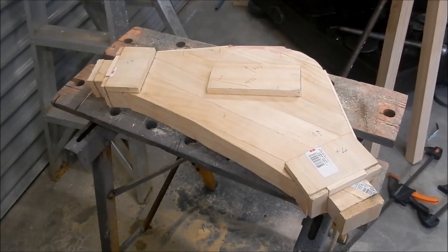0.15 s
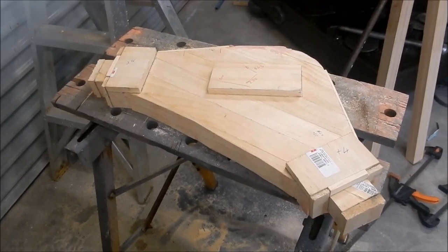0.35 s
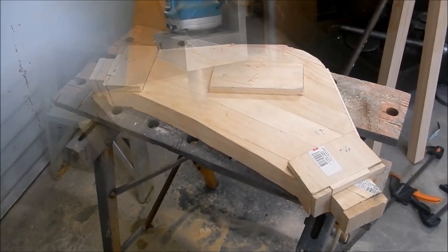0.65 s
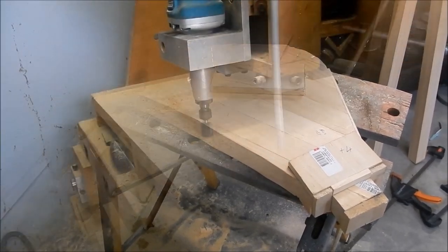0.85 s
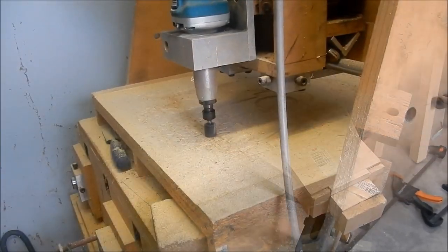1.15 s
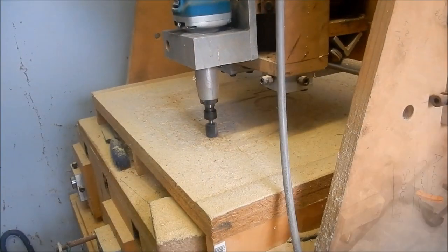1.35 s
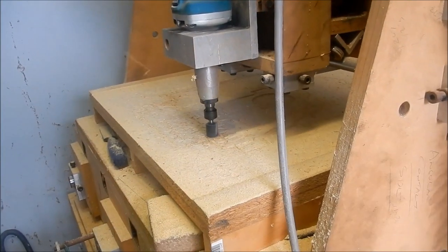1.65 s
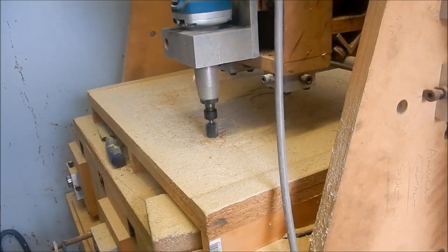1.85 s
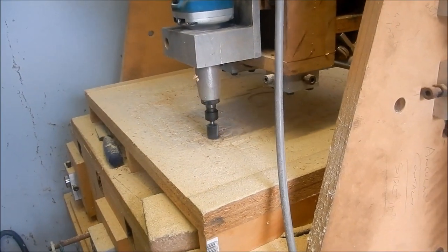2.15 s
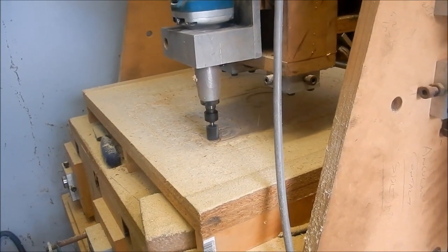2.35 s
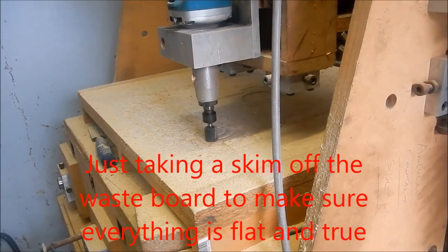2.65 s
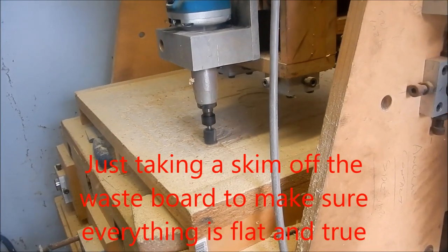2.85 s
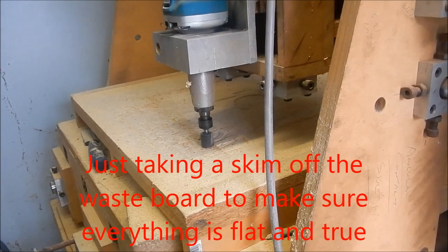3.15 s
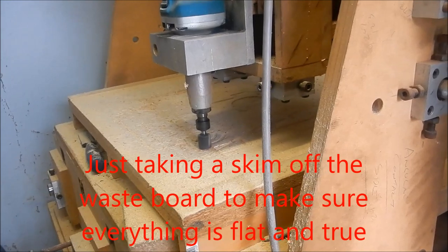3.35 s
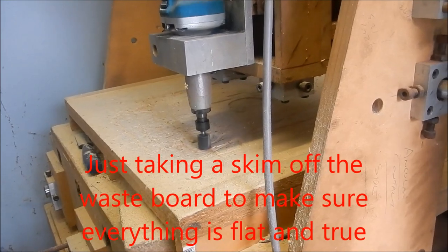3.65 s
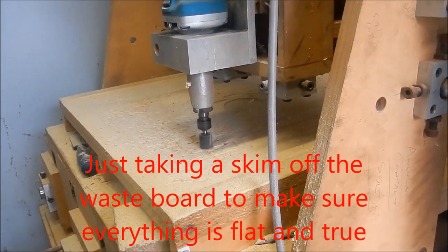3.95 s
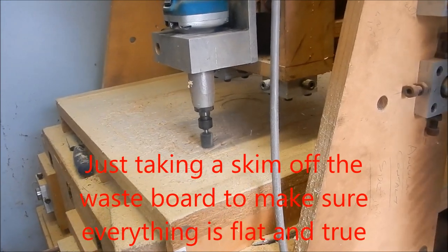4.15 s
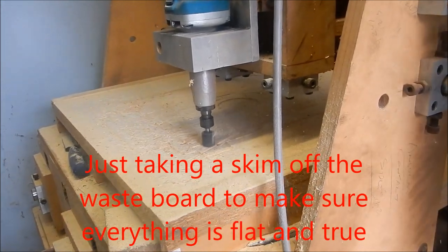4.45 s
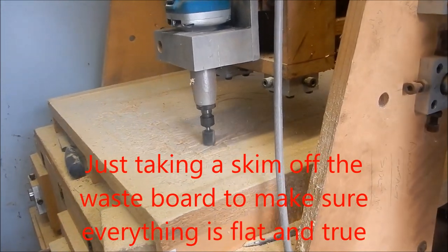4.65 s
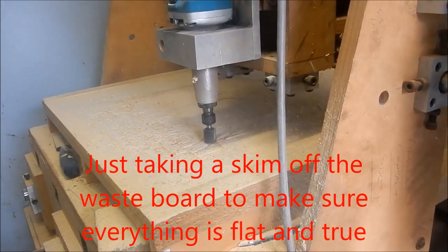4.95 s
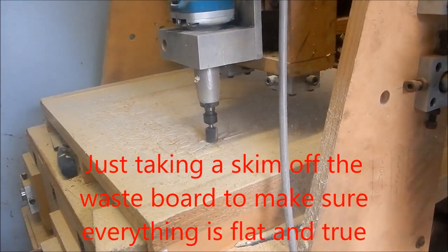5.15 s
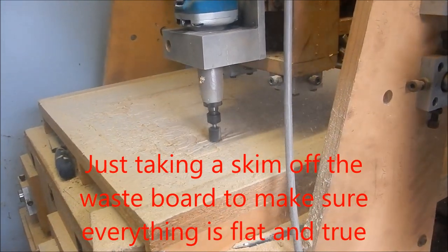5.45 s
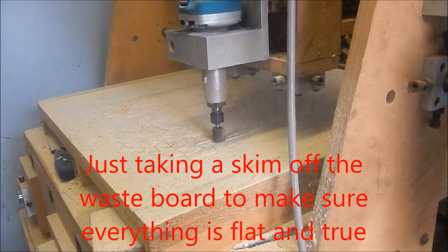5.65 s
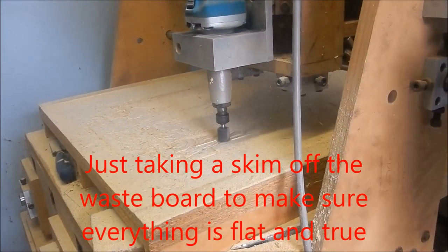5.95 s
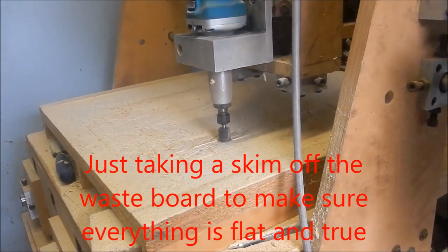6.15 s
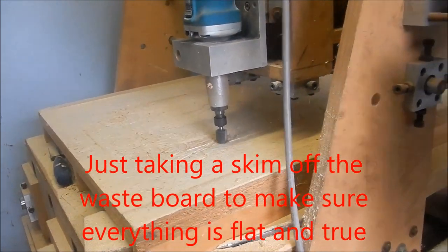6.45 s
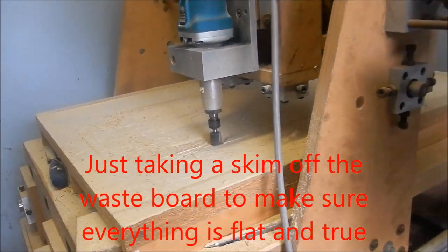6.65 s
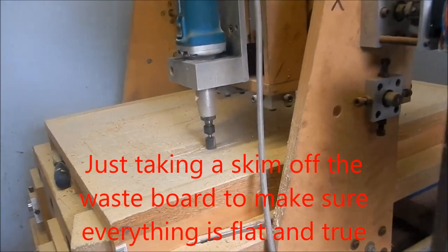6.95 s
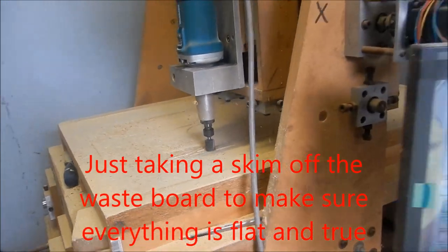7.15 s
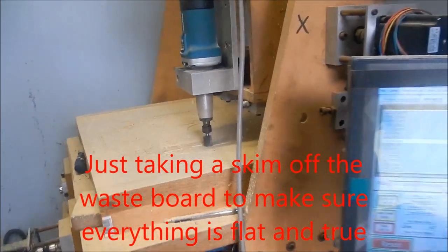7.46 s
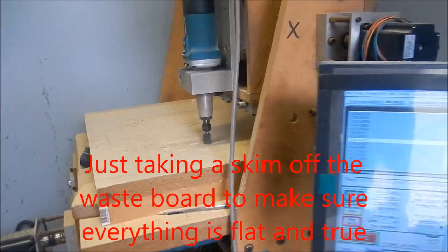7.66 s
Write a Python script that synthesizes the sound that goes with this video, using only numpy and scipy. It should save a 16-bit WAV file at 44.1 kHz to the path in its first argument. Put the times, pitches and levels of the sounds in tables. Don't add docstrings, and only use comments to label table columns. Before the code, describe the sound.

Wind in a quiet yard lasts an instant, then a router switches in abruptly, brightest at first. The continuous electric whine wavers as room reflections swell and cancel its tones, with chips and cooling air hissing around it. Midway, the feed motors turn round with a short falling and rising hum, then buzz faintly behind the cutting. Close small-workshop sound from a modest stereo microphone, its extreme top cut off.

```python
import sys
import numpy as np
from scipy import signal
from scipy.io import wavfile

SR = 44100
rng = np.random.default_rng(int(sys.argv[2]) if len(sys.argv) > 2 else 0)


def master_out(mix):
    frames = np.transpose(np.atleast_2d(mix))
    ceiling = np.clip(frames, -1, 1)
    pcm = np.round(ceiling * 32767).astype(np.int16)
    wavfile.write(sys.argv[1], SR, pcm)


def gain_from_db(level_db):
    decades = np.asarray(level_db, float) / 20
    return 10 ** decades


N = 344862

# (time [s], speed [turns/s])
GOVERNOR = [(.23, 388), (.42, 389.6), (1.3, 391), (1.84, 392.3), (3.4, 393.1), (3.8, 385), (4.1, 386.5),
            (5.03, 386.6), (5.26, 391.3), (6.11, 391.4), (7.0, 389.4), (7.82, 385)]
# (time [s], half length [s], speed lost [turns/s])
BITES = [
    (.74, .4, 3.2),
    (1.53, .26, 3.6),
    (2.33, .3, 6.3),
    (2.86, .28, 8.2),
    (4.27, .15, .9),
    (5.75, .4, 2.3),
    (6.55, .45, 3.1),
    (7.72, .1, 2.9),
]


def spindle_speed():
    return in_time(GOVERNOR)[0] - sum(lost * bell(s, length) for s, length, lost in BITES)


# (time [s], hiss level [dB], brightness [dB])
BIT_LOAD = [(0.25, -32, -5.5), (1.09, -35, -8), (1.51, -32.5, -9), (2.46, -39, -8), (2.74, -36.5, -11),
            (2.78, -41.5, -3), (2.86, -40, -9), (3.6, -36.5, -12.5), (3.96, -37.5, -8.5),
            (5.77, -36.5, -11), (6.49, -37.5, -9.5), (6.93, -37, -10.5), (7.33, -37.5, -10.5),
            (7.82, -37, -9.5)]


def bit_load():
    hiss_db, bright_db = in_time(BIT_LOAD)
    whine_swing_db = 0.85 * (hiss_db - np.mean(hiss_db))
    return hiss_db, 1.78 * (bright_db - np.mean(bright_db)), whine_swing_db


def whine(turn, hz, whine_swing_db, bright_db):
    return low_tones(turn, hz) + cage_sidebands(turn, hz) + overtones(turn, hz, whine_swing_db, bright_db)


# (time [s], unbalance tone [dB], two-flute tone [dB], unbalance left over right [dB])
LOW_TONES = [(.24, -46.5, -47, 13), (.5, -51.5, -43, 17.5), (1.1, -46, -43, -2), (1.65, -48.5, -43.5, 0),
             (2.3, -51, -46.5, 0.5), (2.75, -48.5, -59, 7), (3.0, -51, -49, 7), (3.4, -53.5, -53, 12),
             (3.66, -49, -37, 15), (3.9, -55.5, -44, 11), (4.2, -49.5, -40.5, 9.5), (4.8, -43.5, -40, 4.5),
             (5.3, -43.5, -52.5, 0.5), (5.9, -46.5, -45.5, -0.5), (6.2, -46.5, -73, 0),
             (6.9, -45, -45.5, 0.5), (7.35, -53.5, -50, 3), (7.7, -73, -36, 2)]


def low_tones(turn, hz):
    unbalance_db, flute_db, unbalance_lean_db = in_time(LOW_TONES)
    unbalance_db = unbalance_db + nulls_db(1)
    flute_db = flute_db + nulls_db(2)
    flute_lean_db = 5.5 + 0.55 * np.clip(-47.0 - flute_db, 0, 15)
    unbalance = gain_from_db(unbalance_db + 1.28 * drift(9.0)[0]) * swimming(turn, hz, steady=8.1, rate=17.0)
    flutes = gain_from_db(flute_db + 1.3 * drift(12.0)[0]) * swimming(turn ** 2, 2 * hz, steady=7, rate=10)
    return left_over_right(unbalance_lean_db - 3.0) * unbalance + left_over_right(flute_lean_db - 3.0) * flutes


# (time [s], level by the first tone [dB], level by the second tone [dB])
CAGE_LEVEL = [(.2, -65, -62), (1.6, -63, -54), (2.6, -65, -60), (3.2, -70, -55), (3.52, -70, -52),
              (3.8, -76, -67), (5, -63, -62), (6.3, -62, -56), (6.6, -63, -72), (7.5, -63, -64),
              (7.82, -89, -54)]
CAGE_BEAT = (42.4, 33.5)


def cage_sidebands(turn, hz):
    first_db, second_db = in_time(CAGE_LEVEL)
    beat_one, beat_two = np.exp(2j * np.pi * np.outer(CAGE_BEAT, np.arange(N)) / SR)
    first = gain_from_db(first_db) * swimming(turn * beat_one, hz, steady=1.2, rate=9.2)
    second = gain_from_db(second_db) * swimming(turn ** 2 * beat_two, 2 * hz, steady=1.1, rate=3.6)
    return first + second


# (multiple of turn rate, level [dB])
LADDER = [(1, -2), (2, 0), (3, -6), (4, -7.5), (5, -4), (6, -4.5), (7, -7.5), (8, -4), (9, -11), (10, -7),
          (11, -14), (12, -6.5), (13, -15), (14, -8.5), (15, -21), (16, -7)]


def overtones(turn, hz, whine_swing_db, bright_db):
    ladder, whine_db = dict(LADDER), -47 + whine_swing_db
    out, power, flicker = 0, turn ** 2, gain_from_db(2.64 * drift(27.0)[0])
    for k in range(3, 41):
        power = power * turn * np.exp(2j * np.pi * rng.random())
        level_db = ladder.get(k, -6.5 - 0.68 * (k - 16) - 5.5 * (k % 2))
        load_db = max(k - 10, 0) * (0.025 * bright_db + 0.04 * whine_swing_db)
        flare, rest = flares(k, power, k * hz, flicker)
        swim = swimming(power, k * hz, steady=0.8 + 0.006 * k, rate=6.0 + 0.26 * k)
        out = out + flare + gain_from_db(level_db + nulls_db(k) + whine_db + load_db) * rest * swim
    return out


# (time [s], multiple of turn rate, half length [s], level
# [dB])
FLARES = [(0.317, 5, 0.17, -38.5), (.555, 5, 0.1, -44), (.79, 6, 0.083, -42.5), (2.863, 5, 0.14, -47.5),
          (4.29, 4, 0.56, -50.5), (.78, 7, 0.053, -36.5), (7.366, 4, 0.22, -50.5), (1.0, 6, 0.16, -45),
          (1.03, 5, 0.19, -42.5), (7.76, 6, 0.076, -43.5), (1.298, 10, 0.053, -39.5), (1.405, 5, 0.17, -42),
          (1.586, 10, 0.16, -41.5), (1.597, 8, 0.039, -39), (2.255, 5, .13, -43.5), (2.99, 6, 0.13, -45.5),
          (3.677, 4, 0.13, -45.5), (4.524, 8, 0.27, -48), (5, 8, 0.14, -43), (5.32, 5, .12, -42.5),
          (5.355, 3, 0.27, -42.5), (5.72, 6, 0.13, -42.5), (5.73, 8, .096, -46), (5.964, 8, 0.38, -48),
          (6.633, 12, .11, -49), (6.94, 5, 0.12, -44), (6.932, 6, 0.19, -44.5), (7.17, 6, 0.14, -44),
          (7.636, 6, 0.063, -40.5), (7.714, 10, 0.078, -45),
          (.287, 12, .14, -44.5), (.32, 30, .17, -48), (.32, 26, .19, -49), (.43, 28, .19, -48),
          (.434, 16, .1, -40), (.442, 22, .088, -37.5), (0.438, 18, 0.051, -40), (0.477, 14, 0.22, -36.5),
          (.64, 18, 0.16, -47), (.92, 16, .08, -42), (.97, 22, .17, -44), (1.015, 14, .13, -43.5),
          (1.505, 22, .25, -47), (.8, 14, 0.22, -46), (2.72, 30, 0.17, -56), (2.718, 16, 0.091, -48),
          (4.186, 18, .15, -50), (4.4, 26, 0.64, -56), (5.486, 16, 0.22, -49.5), (5.64, 22, 0.21, -50.5),
          (6.025, 14, 0.077, -49), (6.697, 14, .1, -50.5), (7.05, 10, .055, -45), (.75, 26, .3, -52),
          (1.3, 22, 0.18, -48.5)]


def flares(k, power, hz, flicker):
    swell, rest = 0, 1
    for s, multiple, length, level_db in FLARES:
        if round(multiple) == k:
            swell = np.maximum(swell, gain_from_db(level_db) * bell(s, length))
            rest = rest * (1 - bell(s, length))
    own_flicker = np.roll(flicker, 9001 * k)
    return np.sqrt(2) * lean(hz) * (swell * own_flicker * power.real), rest


# (time [s], multiple of turn rate, half length [s], depth [dB])
NULLS = [(0.908, 1, 0.03, -25), (0.88, 2, 0.059, -22), (1.237, 2, 0.096, -13), (1.356, 2, 0.056, -17),
         (1.454, 2, 0.063, -12), (1.04, 1, 0.032, -7), (1.19, 1, 0.14, -8), (1.9, 2, 0.21, -9),
         (2.142, 2, 0.08, -8), (2.39, 2, 0.08, -9), (2.895, 1, 0.14, -11), (3.278, 2, 0.27, -11),
         (4.912, 1, .08, -3), (5.097, 1, 0.052, -5), (5.09, 2, 0.054, -10), (6.72, 2, 0.048, -6),
         (7.36, 2, 0.075, -17), (7.538, 2, 0.17, -8), (3.85, 2, .12, 0), (7.79, 2, 0.064, -5.5),
         (4.3, 10, 0.46, -8), (7.3, 3, 0.38, -15), (4.4, 3, 0.13, -10), (5.14, 4, .45, -7),
         (7.05, 4, 0.23, -12), (6.55, 5, .3, -10), (4.66, 5, .3, -5), (6.5, 6, 0.28, -7),
         (4.87, 6, .25, -7), (3.8, 8, .25, -10)]


def nulls_db(k):
    return sum(depth_db * bell(s, length) for s, multiple, length, depth_db in NULLS if round(multiple) == k)


# (frequency [Hz], density [dB per Hz])
AIR = [(30, -40), (50, -31), (75, -20), (150, -29), (300, -16), (600, -7), (1000, -6), (2000, -2.5),
       (3000, -1), (5000, -5), (8000, -8.5), (12000, -16), (16000, -22)]
# (frequency [Hz], width [Hz], depth [0-1])
BENCH_DIPS = [
    (890, 25, 0.06),
    (1031, 23, 1),
    (3840, 750, 0.37),
]


def hiss(turn, hiss_db, bright_db):
    air = banded_noise(AIR, patchy_db=0.78, rate=19.0, bright_db=0.5 * bright_db)
    for hz, width_hz, depth in BENCH_DIPS:
        echo = signal.lfilter(*signal.iirpeak(hz, hz / width_hz, fs=SR), air)
        air = air - np.clip(depth, 0, 1) * echo
    puff = 1 + 0.08 * turn.real
    return gain_from_db(hiss_db - 1.5) * puff * air


def feed():
    return feed_reversal() + cross_steps() + return_hum()


# (frequency [Hz], level [dB])
FRAME = [
    (480, -56),
    (530, -63),
    (620, -47.5),
    (685, -56),
    (720, -62),
    (800, -86),
]


def feed_reversal():
    t = np.arange(N) / SR
    slowing = 1400 * np.maximum(3.33 - t, 0)
    speeding_up = 1600 * np.maximum(t - 3.45, 0)
    step_hz = np.minimum(489 + slowing + speeding_up, 860)
    return glide(step_hz, at_hz(FRAME, step_hz), rate=78.0)


# (time [s], step rate [Hz], half length [s], level [dB])
CROSS_STEPS = [
    (3.403, 120.5, .1, -59),
    (7.48, 125, 0.077, -68),
]


def cross_steps():
    t, out = np.arange(N) / SR, 0
    for s, hz, length, level_db in CROSS_STEPS:
        sagging_hz = hz - 150 * np.clip(t - s, -length, length)
        out = out + bell(s, length) * glide(sagging_hz, level_db, rate=15.0)
    return out


# (start [s], frequency [Hz], level [dB])
RETURN_HUM = [
    (3.2, 183, -79),
    (3.2, 199, -73.5),
    (3.9, 231.5, -69.5),
    (2.6, 301.5, -79),
]


def return_hum():
    t, end, out = np.arange(N) / SR, 7.65, 0
    for s, hz, level_db in RETURN_HUM:
        fade_db = np.interp(t, [s - 0.1, s, end, end + 0.18], [-100, level_db, level_db, -100])
        out = out + glide(np.full(N, hz), fade_db, rate=10.4)
    return out


def glide(hz, level_db, rate):
    steps = np.exp(2j * np.pi * np.cumsum(hz) / SR)
    return gain_from_db(level_db) * swimming(steps, np.median(hz), steady=1.25, rate=rate)


# (frequency [Hz], density [dB per Hz])
YARD = [(20, -28), (59, -5), (290, -8.5), (380, -12), (900, -13), (1500, -22), (1900, -19), (2800, -37),
        (3500, -33.5), (7000, -37.5), (11000, -44), (15500, -58)]
# (time [s], level [dB])
YARD_LEVEL = [
    (0, -49),
    (.7, -52.5),
    (1.5, -57.5),
    (1.7, -52),
    (1.74, -86),
    (7.82, -120),
]
# (start [s], frequency [Hz], width [Hz], level [dB])
YARD_WHISTLES = [(0.051, 1300, 40, -64), (0.073, 1707, 90, -59), (.17, 1200, 50, -76),
                 (0.093, 1300, 40, -64), (.09, 2730, 66, -70), (.15, 3020, 40, -72), (0, 3700, 200, -83),
                 (0, 8800, 500, -76), (0, 14000, 500, -88), (0, 11000, 500, -85)]


def yard():
    out = banded_noise(YARD, patchy_db=0.5, rate=3.0)
    for s, hz, width_hz, whistle_db in YARD_WHISTLES:
        band = signal.butter(2, [hz - width_hz / 2, hz + width_hz / 2], "band", fs=SR, output="sos")
        whistle = rms_one(signal.sosfilt(band, rng.standard_normal(N)))
        joins = np.clip((np.arange(N) / SR - s) / 0.03 + 1, 0, 1)
        out = out + gain_from_db(whistle_db - YARD_LEVEL[0][1]) * joins * whistle
    return gain_from_db(in_time(YARD_LEVEL)[0]) * out


def banded_noise(spectrum, patchy_db, rate, bright_db=0):
    out, edges = 0, 24 * 2 ** np.arange(0, 9.6, 0.5)
    together, white = drift(rate)[0], rng.standard_normal((2, 2, N))
    for k, (low, high) in enumerate(zip(edges, edges[1:])):
        band = signal.butter(2, [low, high], "band", fs=SR, output="sos")
        mid, side = signal.sosfilt(band, white[k % 2])
        hz = np.sqrt(low * high)
        alike = likeness(hz, -1)
        bright_share = np.clip(np.log2(hz / 2800.0) / 1.2, 0, 1.2)
        flicker_db = patchy_db * (together + 0.83 * drift(rate)[0])
        gain = gain_from_db(at_hz(spectrum, hz) + flicker_db + bright_share * bright_db)
        stereo = np.sqrt(1 + alike) * mid + np.sqrt(1 - alike) * side * [[1], [-1]]
        out = out + gain * lean(hz) * stereo
    return rms_one(out)


def swimming(turn, hz, steady, rate):
    a, b, c = drift(rate, count=3)
    alike = likeness(hz, 0)
    mid = (steady + a) * turn.real + b * turn.imag
    side = np.sqrt((2 + steady) * (1 - alike) / (1 + alike)) * c * turn.imag
    return lean(hz) / np.sqrt(steady ** 2 / 2 + 1) * np.array([mid + side, mid - side])


# (frequency [Hz], left-right correlation [-1 to 1])
LIKENESS = [(100, 1), (1000, 0.9), (2000, 0.94), (4000, 0.8), (8000, 0.63), (13000, 0.059)]


def likeness(hz, least):
    return np.clip(at_hz(LIKENESS, hz), least, 1)


# (frequency [Hz], left over right [dB])
LEAN = [(60, -5), (110, 4.5), (200, -1), (380, 4.5), (700, -0.5), (1290, 2.5), (2380, 3), (4400, 1.5),
        (8120, 2), (15000, 13.5)]


def lean(hz):
    return left_over_right(at_hz(LEAN, hz))


def left_over_right(db):
    return gain_from_db(db / 2 * np.array([[1], [-1]]))


def drift(rate, count=1):
    r = np.exp(-128 * np.pi * rate / SR)
    slow = signal.lfilter([1], [1, -2 * r, r * r], rng.standard_normal((count, N // 64 + 1002)))[:, 1000:]
    slow = slow / slow.std(axis=1, keepdims=True)
    joined = slow[:, :-1, None] + np.diff(slow)[:, :, None] * np.arange(64) / 64
    return joined.reshape(count, -1)[:, :N]


def bell(s, length):
    return np.cos(np.pi / 2 * np.clip((np.arange(N) / SR - s) / length, -1, 1)) ** 2


def in_time(rows):
    s, *columns = np.transpose(rows)
    return [np.interp(np.arange(N) / SR, s, c) for c in columns]


def at_hz(points, hz):
    points_hz, values = np.transpose(points)
    return np.interp(np.log(hz), np.log(points_hz), values)


def rms_one(x):
    return x / np.sqrt(np.mean(np.abs(x) ** 2) + 1e-20)


def scene():
    hiss_db, bright_db, whine_swing_db = bit_load()
    speed_hz = spindle_speed()
    turn = np.exp(2j * np.pi * np.cumsum(speed_hz) / SR)
    shop = whine(turn, np.mean(speed_hz), whine_swing_db, bright_db)
    shop = shop + hiss(turn, hiss_db, bright_db) + feed()
    shop = signal.sosfilt(signal.butter(4, 69, "high", fs=SR, output="sos"), shop)
    cut_in_s = 0.2322
    return shop * (np.arange(N) >= cut_in_s * SR) + yard()


def low_pass(x):
    return signal.sosfilt(signal.butter(12, 16580, fs=SR, output="sos"), x)


def record(dry):
    top_cut = signal.cheby2(24, 60, 15870, fs=SR, output="sos")
    mix = signal.sosfilt(top_cut, dry)
    return low_pass(mix)


dry = scene()
out = record(dry)
master_out(out)
```